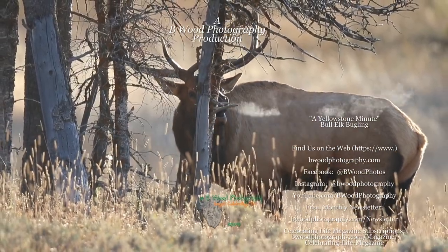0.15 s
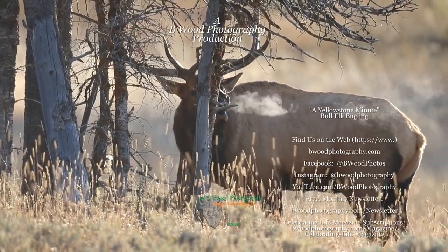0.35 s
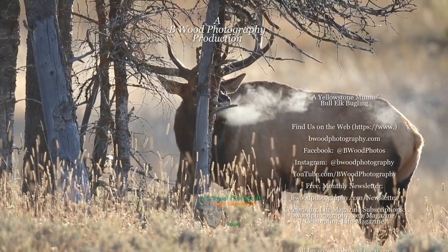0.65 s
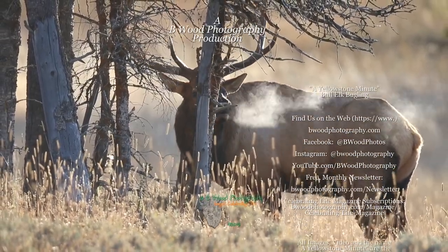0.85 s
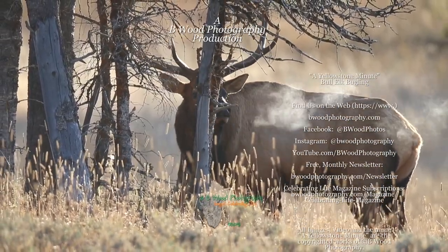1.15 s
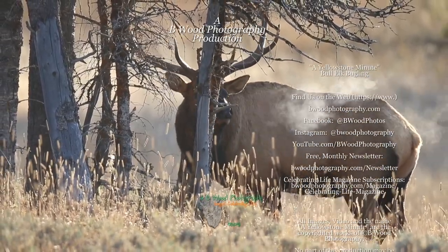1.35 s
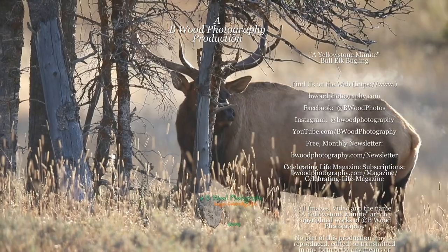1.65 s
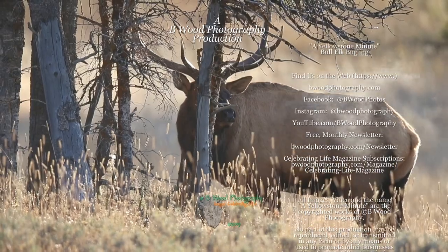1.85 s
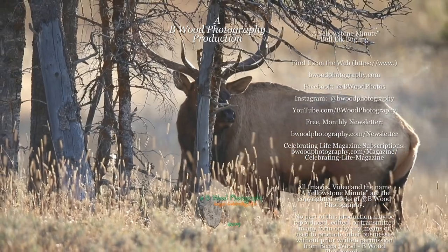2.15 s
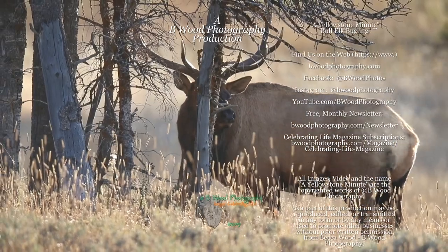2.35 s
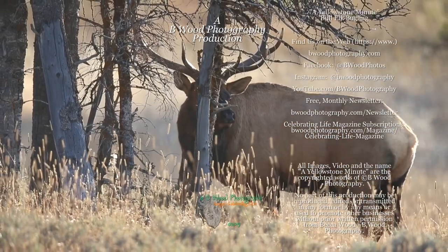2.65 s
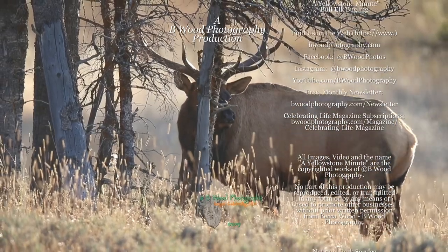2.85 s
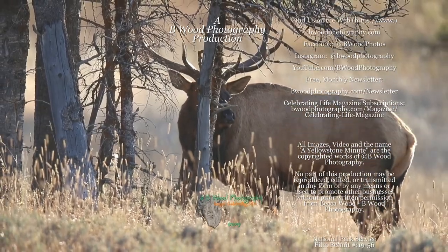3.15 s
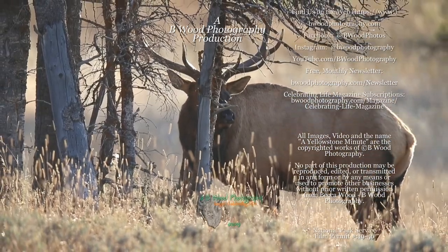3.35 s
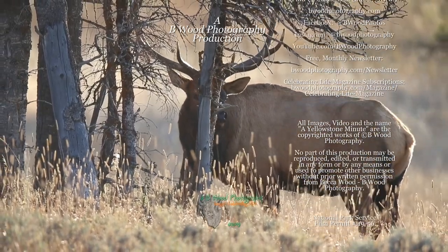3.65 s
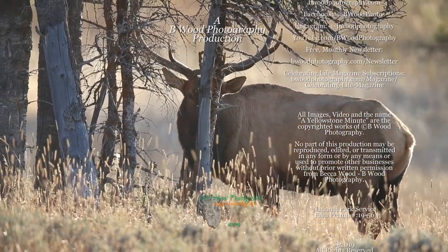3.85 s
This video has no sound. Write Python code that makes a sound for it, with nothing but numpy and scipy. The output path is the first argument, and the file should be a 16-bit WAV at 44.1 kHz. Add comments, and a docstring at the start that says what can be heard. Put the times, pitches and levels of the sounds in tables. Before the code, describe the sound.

A bull elk's nasal whistling bugle slides down and breaks off, leaving steady distant wind.

```python
"""A bull elk at a woodland edge ends its bugle, in mono: the nasal whistle, sines with overtones, holds, splits
in two, slides down and drops in steps between throat resonances. Under it lie hoarse breath, noise through
those resonances, and a short low voice. The trees echo it with a dull decaying noise tail. Steady distant wind,
shaped noise, runs throughout; faint ticks in dry grass, noise bursts, follow, and late on two thin sine notes
of a far bird."""
import sys
import numpy as np
from scipy import signal
from scipy.fft import rfft, irfft
from scipy.io import wavfile
from scipy.ndimage import uniform_filter1d, map_coordinates

SR = 44100
rng = np.random.default_rng(int(sys.argv[2]) if len(sys.argv) > 2 else 0)


def transcribe(signal):
    """Save signal, clipped to [-1, 1], as a 16-bit WAV file at the path in sys.argv[1]."""
    frames = np.atleast_2d(signal).T
    limited = np.clip(frames, -1, 1)
    pcm = np.round(limited * 32767).astype(np.int16)
    wavfile.write(sys.argv[1], SR, pcm)


def volts_from_db(level):
    """Convert decibel levels to linear amplitude ratios."""
    exponent = np.asarray(level, float) / 20
    return 10 ** exponent


N = 176400
T = np.arange(N) / SR


def unit(x):
    """Scale to rms 1."""
    return x / np.sqrt(np.mean(x ** 2))


def band(x, hz, width_hz):
    """Resonance with gain 1 at its centre."""
    return signal.lfilter(*signal.iirpeak(hz, hz / width_hz, fs=SR), x)


def walk(rate_hz):
    """Smooth random wander, spread 1: noise averaged twice over one period of the rate."""
    k = int(SR / rate_hz)
    once = uniform_filter1d(rng.standard_normal(N), k)
    return unit(uniform_filter1d(once, k))


def curve(rows, k=1):
    """Column k of a table over time in dB, -99 outside it."""
    rows = np.array(rows, float)
    return np.interp(T, rows[:, 0], rows[:, k], left=-99, right=-99)


def ring(throat):
    """Turbulent air through steep resonances, each three equal filters in a row."""
    total = 0
    for hz, width_hz, db in throat:
        air = rng.standard_normal(N)
        for _ in range(3):
            air = band(air, hz, 2 * width_hz)
        total = total + volts_from_db(db) * unit(air)
    return total


def note(rows, third_db, jitter, flutter):
    """Phase, level and wave of one wavering tone with two overtones; jitter and flutter are shares."""
    fade_s, jitter_hz = 0.004, 297
    start_s, end_s = rows[0][0], rows[-1][0]
    s, hz = np.array(rows, float).T[:2]
    pitch_hz = np.interp(T, s, hz) * (1 + jitter * walk(jitter_hz))
    phase = 2 * np.pi * np.cumsum(pitch_hz) / SR
    # a note already sounding at the start has no fade-in
    since_start = T - start_s + (start_s < fade_s)
    gate = np.clip(np.minimum(since_start, end_s - T) / fade_s, 0, 1)
    gate = gate * (1 + flutter * walk(jitter_hz))
    first = gate * volts_from_db(curve(rows, k=2))
    second = gate * volts_from_db(curve(rows, k=3))
    upper = second * (np.sin(2 * phase) + volts_from_db(third_db) * np.sin(3 * phase))  # third_db: under the second
    return phase, first, np.sqrt(2) * (first * np.sin(phase) + upper)


def sum_tone(a, b):
    """Two notes sounding at once multiply into a tone at the sum of their pitches."""
    return volts_from_db(12.5) * a[1] * b[1] * np.sin(a[0] + b[0])


def whistle():
    """Nasal whistle: overlapping gliding notes, and the sum tones where two of them meet."""
    # whistle notes in order of onset: time_s, pitch_hz, level_db, second_partial_db
    held_rows = [(0.0, 2119, -39, -61), (0.06, 2108, -39, -68), (0.256, 2097, -43, -66),
                 (0.324, 2086, -44, -68), (0.342, 2070, -39, -72), (0.386, 2045, -40.5, -71),
                 (0.394, 1994, -40, -88), (0.408, 2086, -41, -71), (0.415, 2026, -51, -86)]
    slide_rows = [(0.3, 2698, -64, -77), (0.328, 2666, -48, -76), (0.334, 2642, -53, -76),
                  (0.374, 2558, -36, -73), (0.394, 2500, -42, -76), (0.424, 2408, -37.5, -70),
                  (0.438, 2376, -50, -79), (0.445, 2365, -51, -79)]
    under_rows = [(0.395, 2005, -57, -86), (0.415, 1877, -54, -98), (0.429, 1862, -38, -92),
                  (0.443, 1893, -51, -100), (0.451, 1830, -52, -82), (0.477, 1837, -42, -110),
                  (0.507, 1780, -42, -68), (0.535, 1790, -47, -83)]
    fall_rows = [(0.44, 2360, -46, -85), (0.452, 2315, -48, -82), (0.466, 2310, -55, -79),
                 (0.482, 2256, -39, -84), (0.516, 2084, -50.5, -77), (0.602, 1885, -40, -82),
                 (0.618, 1887, -49.5, -82), (0.642, 1794, -42, -85), (0.655, 1850, -57, -84)]
    step_high_rows = [(0.59, 1219, -58, -66), (0.622, 1224, -46, -58), (0.64, 1220, -45.5, -50),
                      (0.662, 1217, -39.5, -42.5), (0.68, 1220, -49, -49)]
    step_low_rows = [(0.672, 994, -63, -64), (0.678, 993, -42, -62), (0.686, 988, -34.5, -47),
                     (0.698, 926.6, -35, -41), (0.716, 924.5, -40, -39), (0.73, 980, -44, -56),
                     (0.74, 928, -58, -46), (0.75, 956, -38, -49), (0.758, 1015, -47, -70),
                     (0.78, 952.7, -66, -64)]
    step_last_rows = [(0.715, 676, -57, -63), (0.727, 690, -46, -85), (0.737, 636, -37.5, -74),
                      (0.75, 727, -66, -61)]
    held = note(held_rows, third_db=-11.5, jitter=0.0006, flutter=0.024)
    slide = note(slide_rows, third_db=-14, jitter=0.0031, flutter=0.18)
    under = note(under_rows, third_db=-17, jitter=0.013, flutter=0.18)
    fall = note(fall_rows, third_db=-15, jitter=0.0224, flutter=0.21)
    step_high = note(step_high_rows, third_db=-30, jitter=0.0043, flutter=0.12)
    step_low = note(step_low_rows, third_db=-25, jitter=0.0067, flutter=0.14)
    step_last = note(step_last_rows, third_db=-10, jitter=0.0064, flutter=0.2)
    notes = [held, slide, under, fall, step_high, step_low, step_last]
    sums = sum_tone(held, slide) + sum_tone(under, slide) + sum_tone(under, fall)
    return sum(wave for _, _, wave in notes) + sums


def breath():
    """Air rings the narrow resonances of the long throat, rasps between them and growls at the end."""
    # throat resonances: centre_hz (the low ones before their shift), width_hz, relative level_db
    throat_low = [(694, 48, -15), (964, 35, -3.5)]
    throat_mid = [(1451, 71, -1)]
    throat_high = [(1876, 100, -5), (2236, 100, -8), (2442, 120, -1.5)]
    throat_top = [(2814, 50, -1)]
    # broad rasp between the resonances: centre_hz, width_hz, relative level_db
    rasp_colour = [(2140, 280, -7.5), (2400, 270, -1.5), (3130, 175, -15), (4100, 310, -20.5),
                   (4780, 740, -25), (6500, 2500, -24.5)]
    # breath through the low resonances: time_s, level_db, pitch_shift as a factor
    breath_low = [(0, -60, 1.06), (.064, -50.5, 1.07), (.1, -63, 1.06), (.13, -50, 1.026),
                  (.21, -55.5, 1.013), (0.275, -52, 1.044), (0.306, -52.5, 1.06), (.37, -66, 1.02),
                  (.416, -73, 1.0), (.456, -50.5, .98), (0.477, -41, .99), (.508, -50, .98),
                  (.558, -46.5, 1.0), (0.592, -53, 1.01), (.656, -44, 1.04), (.68, -51, 1.02),
                  (.73, -49, 1.1), (.77, -64, 1.02), (.8, -90, 1.4)]
    # breath through the middle, high and top resonances, rasp, closing growl: time_s, level_db
    breath_mid = [(0.0, -65), (0.062, -61), (0.082, -60), (0.12, -68), (0.208, -58), (0.274, -82),
                  (0.304, -60), (0.44, -72), (0.508, -50), (0.558, -57.5), (0.594, -44), (0.658, -57.5),
                  (0.686, -44.5), (0.722, -51), (0.768, -70), (0.8, -71)]
    breath_high = [(0, -55.5), (.2, -66), (.3, -58), (.385, -68), (.4, -43), (.46, -40), (.52, -46.5),
                   (.55, -54), (.62, -62), (.68, -52.5), (.74, -56), (0.769, -69), (.8, -78)]
    breath_top = [(0.0, -59.5), (0.052, -71), (0.076, -65), (0.102, -68.5), (0.298, -54.5), (0.378, -74),
                  (0.412, -60), (0.608, -78), (0.696, -56), (0.8, -96)]
    rasp = [(0, -54.5), (.38, -58), (.4, -57.5), (.5, -52), (.56, -57), (.66, -54), (.74, -61), (.765, -78),
            (0.791, -70)]
    growl = [(0.451, -65), (.55, -59), (.7, -62), (0.737, -47), (0.769, -54), (.8, -70)]
    # reading the ringing air faster or slower moves its resonances up or down
    time_s, _, shift = np.array(breath_low).T
    place = np.cumsum(np.interp(T, time_s, shift))
    low_air = map_coordinates(ring(throat_low), [place], mode="mirror")
    growl_air = ring([(452, 740, 0)])  # centre Hz, width Hz, dB
    layers = [(low_air, breath_low), (ring(throat_mid), breath_mid), (ring(throat_high), breath_high),
              (ring(throat_top), breath_top), (ring(rasp_colour), rasp), (growl_air, growl)]
    return sum(air * volts_from_db(curve(level)) for air, level in layers)


def wind():
    """Distant wind and hiss: noise in octave bands that swell together and flicker alone."""
    # wind colour: frequency_hz, relative density_db (per Hz)
    colour = [(12, -51), (20, -6.5), (64, -1.5), (129, -0.5), (162, -3.5), (191, -3), (406, -1),
              (441, -1.5), (480, -1.5), (537, -1.5), (1240, -7.5), (1350, -10), (2560, -24.5), (8480, -31),
              (15600, -33.5)]
    # slow changes of the wind: time_s, low_bands_db (centres to 960 Hz), high_bands_db (from 1920 Hz)
    gusts = [(0, 0.5, 1), (1.2, 0, 1.5), (2, -0.5, 0.5), (3, 0.5, 1), (4, 0.4, 1)]
    level_db, swell_db, flicker_db = -58, 0.39, 0.5
    hz = np.maximum(np.arange(N // 2 + 1) * SR / N, 1)
    colour_hz, colour_db = np.array(colour, float).T
    air = rfft(rng.standard_normal(N)) * volts_from_db(np.interp(np.log(hz), np.log(colour_hz), colour_db))
    octave = np.clip(np.log2(hz / 30), 0, 9)
    swell = swell_db * walk(1.0)
    out = 0
    for k in range(10):
        share = np.clip(1 - abs(octave - k), 0, 1)  # neighbouring bands cross-fade
        gust = curve(gusts, k=2 if k > 5 else 1)
        out = out + irfft(air * share, N) * volts_from_db(gust + swell + flicker_db * walk(8.6))
    return unit(out) * volts_from_db(level_db)


def trees(x):
    """Diffuse dull echo from the trunks: a decaying, low-passed noise tail after a short gap."""
    echo_db, t60_s, gap_s, top_hz = -27, 1, 0.026, 1930
    t = T[:SR]
    tail = rng.standard_normal(SR) * (t > gap_s) * np.exp(-np.log(1000) * t / t60_s)
    tail = signal.lfilter(*signal.butter(2, top_hz, fs=SR), tail)
    tail = tail / np.sqrt(np.sum(tail ** 2))
    return volts_from_db(echo_db) * signal.fftconvolve(x, tail)[:N]


def catches():
    """Raspy catches in the throat: short hissing noise bursts where the voice breaks."""
    # catches: centre_s, level_db
    bursts = [(.38, -72.5), (.515, -73.5), (.61, -79), (.697, -72.5), (.714, -71.5)]
    # their colour: centre_hz, width_hz, relative level_db
    colour = [(7360, 1800, -1.3), (4100, 590, -0.85)]
    length_s = 0.0052  # from the peak to 1/e
    swell = sum(volts_from_db(db) * np.exp(-((T - s) / length_s) ** 2) for s, db in bursts)
    return ring(colour) * swell


def low_voice():
    """Short low voice under the whistle, a rough tone whose second partial can outweigh the first."""
    # low voice: time_s, pitch_hz, level_db, second_partial_db
    rows = [(0.46, 353.7, -85, -62), (0.462, 357, -69, -56), (0.482, 345.4, -67, -60),
            (0.53, 342, -59, -47.5), (0.546, 331, -59.5, -55), (0.606, 323, -70, -60),
            (0.62, 325.4, -64, -58)]
    return note(rows, third_db=-11, jitter=0.0075, flutter=0.18)[2]


def grass():
    """Short ticks in dry grass: broad bright noise, each starting at once and dying away."""
    # ticks: start_s, level_db at the start
    ticks = [(.853, -69), (.944, -70), (1.119, -69), (1.464, -72), (1.539, -75), (2.329, -71), (2.419, -70),
             (2.655, -69), (2.741, -71), (2.919, -68.5), (3.351, -67), (3.538, -67)]
    decay_s = 0.0068  # to 1/e
    env = sum(volts_from_db(db) * (T > s) * np.exp(-np.maximum(T - s, 0) / decay_s) for s, db in ticks)
    return env * unit(band(rng.standard_normal(N), 4150, 4300))  # centre Hz, width Hz


def bird():
    """Two faint thin notes far off: pure sines under rounded swells."""
    # bird notes: start_s, length_s, pitch_hz, peak level_db
    notes = [(3.35, .035, 3940, -78), (3.405, .04, 3970, -76)]
    total = 0
    for start_s, length_s, hz, db in notes:
        swell = np.sin(np.pi * np.clip((T - start_s) / length_s, 0, 1)) ** 0.5
        total = total + volts_from_db(db) * swell * np.sin(2 * np.pi * hz * T)
    return total


def scene():
    """Elk with its echo over wind, grass and bird, on one channel."""
    call = whistle() + breath() + catches() + low_voice()
    return (call + wind() + trees(call) + grass() + bird())[None]


def top_cut(x):
    """Nothing passes above the cut-off."""
    return signal.sosfilt(signal.butter(12, 15800, fs=SR, output="sos"), x)


def record(dry):
    """Finish the mono mix, with no change of level."""
    return top_cut(dry)


dry = scene()
out = record(dry)
transcribe(out)
```